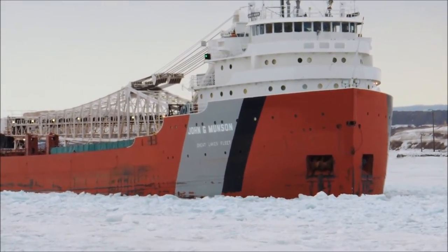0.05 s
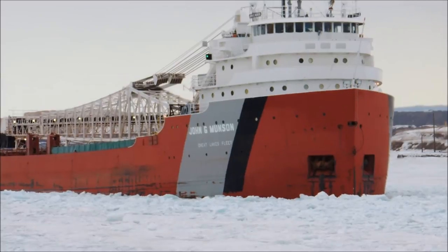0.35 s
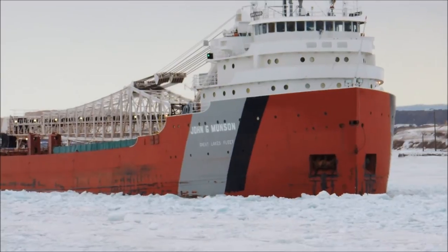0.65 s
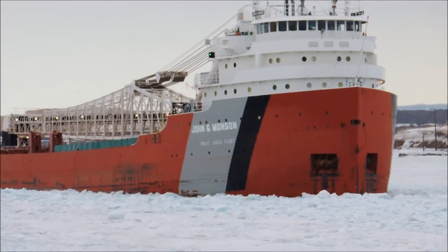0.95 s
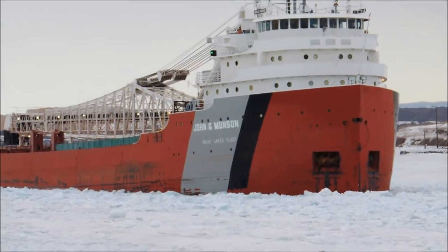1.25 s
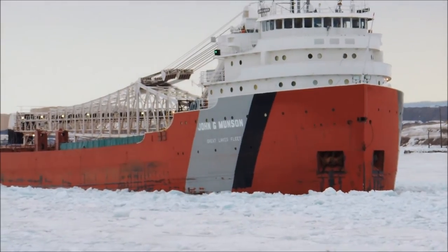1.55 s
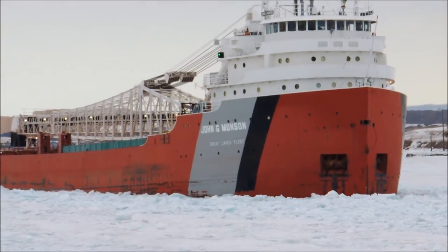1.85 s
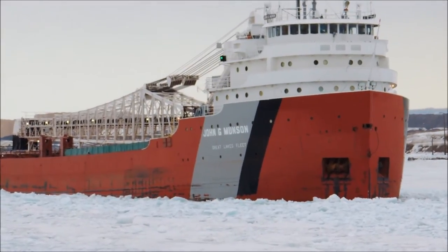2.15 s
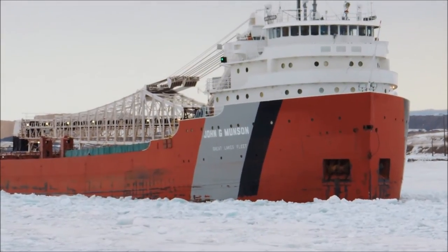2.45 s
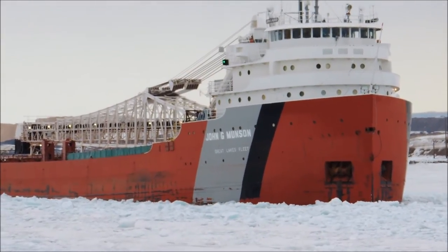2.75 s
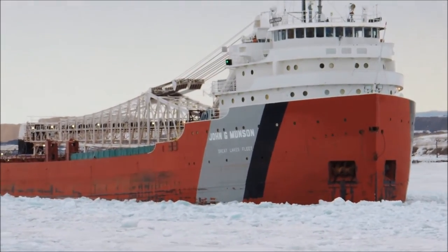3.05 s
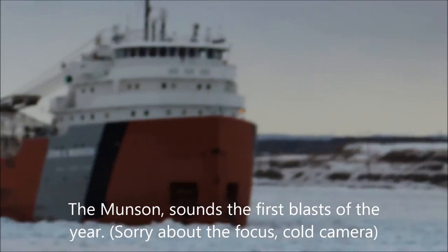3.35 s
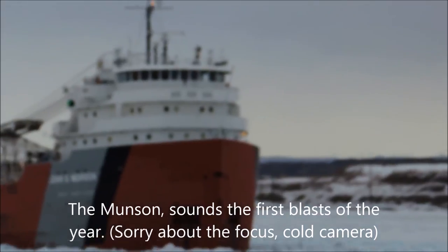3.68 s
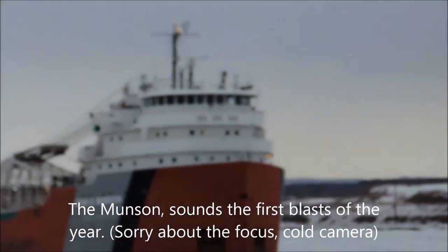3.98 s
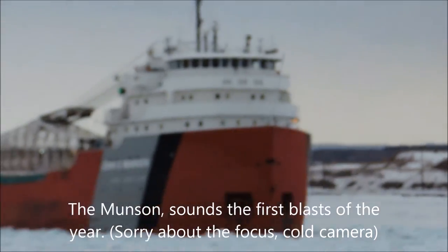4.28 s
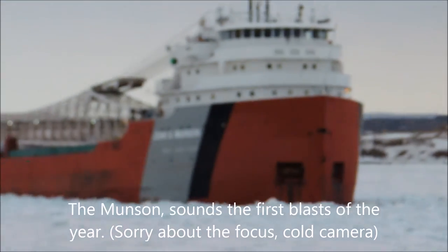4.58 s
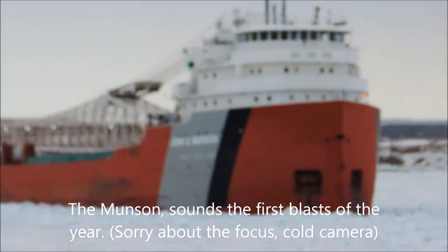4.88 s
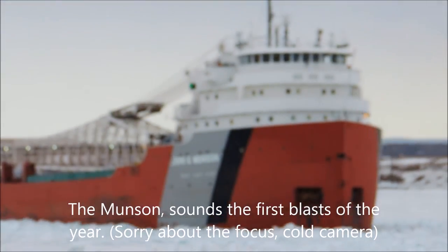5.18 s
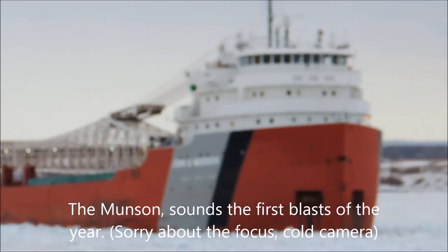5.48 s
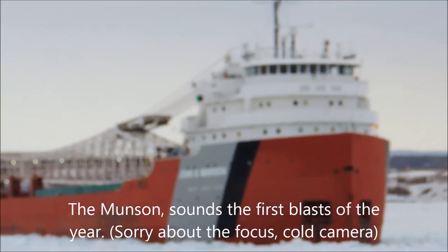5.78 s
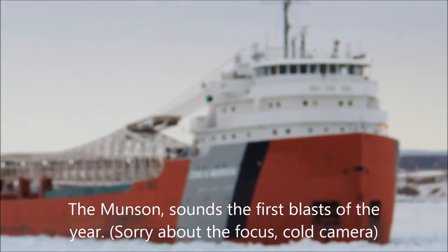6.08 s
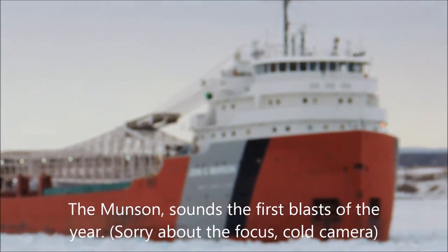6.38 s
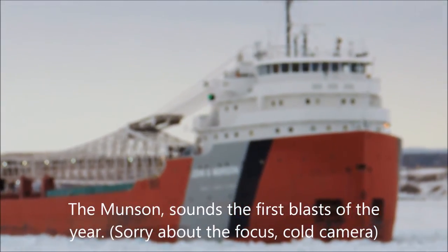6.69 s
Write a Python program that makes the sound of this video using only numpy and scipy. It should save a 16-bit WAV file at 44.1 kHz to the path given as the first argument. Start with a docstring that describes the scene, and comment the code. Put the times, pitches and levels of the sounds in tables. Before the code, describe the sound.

Gusty wind buffets the microphone over a ship's faint drone, then its deep air horn blows twice, echoing from the shore.

```python
"""A freighter's machinery drones in an icy channel while gusts thump and flutter on the right
microphone port; the left one mostly rumbles. Sharp ticks sound; the hand-held camera knocks once.
The ship gives two long blasts on its low air horn: a diaphragm chops air into pulses,
the ice cancels a drifting band and the shore echoes.
The sound drops out briefly and returns with the first blast under way."""
import sys
import numpy as np
from scipy import signal
from scipy.fft import rfft, irfft
from scipy.io import wavfile
from scipy.ndimage import uniform_filter1d

SR = 44100
rng = np.random.default_rng(int(sys.argv[2]) if len(sys.argv) > 2 else 0)


def wrap_up_sound(samples):
    """Save the sound to the file named by the first command line argument, as 16-bit audio."""
    columns = np.atleast_2d(samples).T
    # keep every value between -1 and 1, then stretch to whole-number steps
    tamed = np.clip(columns, -1, 1)
    steps = np.round(tamed * 32767).astype(np.int16)
    wavfile.write(sys.argv[1], SR, steps)


N = 296793
TIME_S = np.arange(N) / SR

# Distant machinery. Each row: frequency in Hz, relative density in dB.
DRONE_SPECTRUM = [(30, 7), (100, 1.5), (170, -5), (400, -10), (500, -3.5), (600, -1), (850, 0), (1140, -4),
                  (1260, -11), (1500, -9.5), (1900, -17.5), (2800, -22), (4000, -30), (8000, -52)]
# Its resonances. Each row: centre in Hz, width in Hz, lift in dB.
DRONE_RESONANCES = [(570, 55, 2.6), (692, 41, 9.9), (986.4, 55, 11.8), (1138, 37, 5.9), (1485, 140, 2.8),
                    (2483, 99, 11.4)]
# The drone as the wind carries it. Each row: time in seconds, level in dB.
DRONE_LEVELS = [(0, -45), (1.8, -44.5), (2.5, -45), (3.3, -44.5), (5.0, -45), (6.73, -43.5)]

# Wind flutter, port rumble, microphone hiss. Each row: frequency in Hz, relative density in dB.
FLUTTER_SPECTRUM = [(15, -19), (40, -3.5), (80, 3), (125, 1.5), (210, -5), (350, -9.5), (500, -16),
                    (800, -27), (1300, -38.5), (2500, -65), (6000, -73)]
RUMBLE_SPECTRUM = [(3, -6.5), (10, -3), (20, -10), (40, -16), (65, -30), (110, -53), (250, -54), (800, -82)]
HISS_SPECTRUM = [(100, -1), (3000, 3), (5000, 2.5), (8000, 1), (14000, -0.5)]
# Gusts at the right port. Each row: start in seconds, hold in seconds, level in dB.
GUSTS = [(0.185, .02, -32.5), (.772, .06, -19.5), (1.307, .06, -23.5), (1.44, 0.16, -29),
         (1.786, 0.13, -31), (2.022, .05, -32), (2.38, 0.12, -38.5), (2.898, 0.15, -35.5), (3.81, .02, -25),
         (4.3, 0.14, -23), (4.57, 0.16, -24.5), (4.747, 0.027, -19), (4.93, .12, -24.5),
         (5.095, 0.054, -20.5), (5.518, 0.079, -16), (5.636, .26, -18), (6.122, 0.6, -21)]
# Hardest eddies at each port. Each row: centre in seconds, envelope peak in dB, frequency in Hz.
RIGHT_EDDIES = [(.19, -14, 234), (.549, -2, 174), (.771, -6, 210), (.81, -11, 220), (1.324, -8, 204),
                (1.45, -11.5, 197), (1.492, -9, 260), (1.554, 0, 240), (1.907, -14, 170), (4.669, -9, 187),
                (4.74, -10.5, 239), (4.786, -2, 174), (5.08, -5, 172), (5.115, 0, 138), (5.331, -6.5, 167),
                (5.526, 0, 374), (5.548, 2, 276), (5.65, -0.5, 245), (5.67, -3.5, 261), (5.707, -1, 212),
                (5.733, -2.5, 213), (5.76, -3.5, 205), (5.793, -3.5, 196), (5.876, -7.5, 254),
                (6.219, -2, 307), (6.323, -1.5, 283), (6.404, -4, 166), (6.494, -1, 330)]
LEFT_EDDIES = [(2.505, -21.5, 330), (2.6, -19.5, 344), (3.292, -24.5, 160)]

# Short ticks and the cracks of hard wind thumps.
# Each row: start in seconds, peak in dB, band in Hz, T60 in seconds, left over right in dB.
SHARP_TICKS = [(.819, -40.5, 4800, .02, -6), (4.044, -28.5, 2250, 0.036, -1),
               (4.0731, -25, 4400, 0.0039, 3), (4.072, -21.5, 1690, 0.011, 1), (5.077, -31, 1500, .026, 0),
               (5.116, -36, 5000, 0.0043, -9), (5.15, -30.5, 1970, 0.017, 5), (5.29, -37, 1800, 0.017, 0),
               (5.548, -18, 1100, 0.012, -13), (5.706, -29, 744, 0.019, -9), (6.398, -30, 2770, 0.012, -3)]
# Camera body modes. Each row: frequency in Hz, relative level in dB, T60 in seconds.
BODY_MODES = [(626, 3.5, 0.041), (776, -17, .03), (897, -5, 0.048), (1033, 0, .035), (1214, -2, 0.032),
              (1810, -19, 0.045), (2235, -19, 0.019), (3200, -37, 0.04)]

# Horn blasts. Each row: valve opening, attack and valve closing in seconds, base level in dB,
# opening surge in dB, surge length in seconds.
BLASTS = [(3.314, 0.0296, 4.44, -23, 2.5, 0.46), (5.955, .163, 6.9, -22, 2, 0.13)]
# Horn spectrum, one list a blast. Each row: harmonic number, relative level in dB.
HORN_PARTIALS = [
    [(1, 2), (2, 4.5), (3, -7.5), (4, -5.5), (5, -4), (6, -9), (7, -8.5), (8, 0), (9, -2.5), (10, -2),
     (11, 1), (12, -4.5), (13, -8), (14, -16.5), (15, -17), (16, -28), (17, -28), (18, -29), (19, -24),
     (20, -32.5), (21, -26), (22, -24.5), (23, -28.5), (24, -45), (25, -35), (26, -36), (27, -32),
     (28, -33.5), (29, -36), (30, -36.5)],
    [(1, 3), (2, -1.5), (3, 2), (4, 1.5), (5, -5.5), (6, -11), (7, -1.5), (8, -7), (9, -6), (10, -9.5),
     (11, -8.5), (12, -12.5), (13, -10), (14, -14.5), (15, -15.5), (16, -20), (17, -25), (18, -22),
     (19, -22), (20, -25), (21, -20.5), (22, -24.5), (23, -25.5), (24, -30), (25, -30), (26, -44),
     (27, -33.5), (28, -35.5), (29, -30), (30, -36)],
]
# Band cancelled by the ice reflection, one list a blast.
# Each row: time in seconds, centre in Hz, depth in dB (negative lifts).
ICE_NOTCHES = [
    [(3.4, 957, 16), (3.6, 979, 17), (3.85, 996, 12), (4.15, 1136, 23), (4.3, 1067, 31), (4.5, 1056, 12)],
    [(6.1, 1860, 18), (6.22, 1790, -5), (6.45, 1700, 12), (6.73, 1695, -2)],
]
# Drift of two horn bands, one list a blast. Each row: time in seconds, level in dB (used less its mean).
UPPER_MID_DRIFT = [
    [(3.41, -40), (3.8, -42.5), (3.95, -41.9), (4.16, -39), (4.35, -35)],
    [(6.16, -37.2), (6.32, -38), (6.5, -33), (6.69, -32.5)],
]
TREBLE_DRIFT = [
    [(3.41, -50.5), (3.7, -43), (3.98, -47), (4.27, -44.5), (4.42, -50)],
    [(6.16, -40.5), (6.34, -50.3), (6.58, -39), (6.69, -45)],
]

HORN_HZ = 86.74  # at full pressure
DROPOUT_START_S, DROPOUT_END_S = 3.306, 3.371


def undb(db):
    """Decibels to gain."""
    return 10 ** (np.asarray(db) / 20)


def curves(table):
    """Value columns of (seconds, value, ..) rows, at every sample."""
    times_s, *columns = np.transpose(table)
    return [np.interp(TIME_S, times_s, column) for column in columns]


def noise(spectrum, resonances=()):
    """Unit-rms noise with the given spectrum, raised at its resonances."""
    bins_hz = np.fft.rfftfreq(N, 1 / SR) + 1e-3
    hz, db = np.transpose(spectrum)
    shape_db = np.interp(np.log(bins_hz), np.log(hz), db)
    for centre_hz, width_hz, lift_db in resonances:
        shape_db += lift_db / (1 + (2 * (bins_hz - centre_hz) / width_hz) ** 2)
    shaped = irfft(rfft(rng.standard_normal(N)) * undb(shape_db), N)
    return shaped / shaped.std()


def wander(rate_hz):
    """Smooth random curve, spread near 1."""
    steps = rng.standard_normal(2048)
    ramps = np.interp(TIME_S * rate_hz, np.arange(len(steps)), steps)
    return 1.3 * uniform_filter1d(ramps, int(SR / rate_hz / 2) + 1)


def add(track, start_s, sound):
    """Mix a short sound into a track."""
    i = int(start_s * SR)
    track[i:i + len(sound)] += sound[:N - i]


def machinery(shared_power=0.32, swell_db=1.3):
    """Engine and fans drone through fixed resonances and swell slightly."""
    level_db, = curves(DRONE_LEVELS)
    common, *sides = (noise(DRONE_SPECTRUM, DRONE_RESONANCES) for _ in range(3))
    drone = np.sqrt(shared_power) * common + np.sqrt(1 - shared_power) * np.array(sides)
    return undb(level_db + swell_db * wander(5)) * drone


def airflow_db(attack_s=0.013, release_s=0.048, unsteady_db=1.43):
    """Wind strength: each gust rises fast, holds and dies back into an unsteady breeze."""
    breeze_db = np.where(TIME_S < DROPOUT_START_S, -39.5, -31)
    power = undb(breeze_db) ** 2
    for start_s, hold_s, db in GUSTS:
        before = np.maximum(start_s - TIME_S, 0) / attack_s
        after = np.maximum(TIME_S - start_s - hold_s, 0) / release_s
        power += (undb(db) * np.exp(-np.minimum(before + after, 20))) ** 2
    return 10 * np.log10(power) + unsteady_db * wander(18)


def small_eddies(flow_db, rate_hz=20, over_flow_db=7.5, scatter_db=1.5, centre_hz=175, spread_oct=0.27):
    """Rows of eddies that arrive at random, scaled by the flow that carries them."""
    gaps, sizes, pitches = rng.standard_normal((400, 3)).T
    times_s = .05 + np.cumsum(abs(gaps)) * np.sqrt(np.pi / 2) / rate_hz
    lifts_db = over_flow_db + scatter_db * np.tanh(sizes)
    pitches_hz = centre_hz * 2 ** (spread_oct * pitches)
    return [(at_s, flow_db[int(at_s * SR)] + lift_db, hz)
            for at_s, lift_db, hz in zip(times_s, lifts_db, pitches_hz) if at_s < TIME_S[-1]]


def eddy_thumps(eddies, width_cycles=0.56, rasp_db=-19.5, rasp_t60_s=0.057, rasp_hz=(310, 756.4)):
    """Each eddy sucks at the port, then pushes, and breaks up in a short rasp."""
    out, t = np.zeros(N), np.arange(-SR // 50, SR // 50) / SR
    band = signal.butter(3, rasp_hz, "band", fs=SR, output="sos")
    for (at_s, db, hz), white in zip(eddies, rng.standard_normal((512, len(t)))):
        swing = np.sin(2 * np.pi * hz * t) / (1 + (hz * t / width_cycles) ** 2) ** 2.3
        add(out, at_s + t[0], undb(db) * swing)
        rasp = signal.sosfilt(band, white * undb(-60 * (t - t[0]) / rasp_t60_s))
        add(out, at_s - .5 / hz, undb(1.22 * db + rasp_db) * rasp / abs(rasp).max())  # hard hits rasp most
    return out


def wind(ragged_db=2.5, leak_db=-31, left_flutter_db=-27, left_rumble_db=-24, right_rumble_db=-42):
    """Ragged flutter and thumps at the right port; mostly slow, heaving pressure at the left."""
    flow_db = airflow_db()
    ragged = undb(ragged_db * wander(70))
    flutter = noise(FLUTTER_SPECTRUM) * ragged / np.sqrt(np.mean(ragged ** 2))
    heave = undb(.02 * (flow_db - flow_db.mean()))
    left = undb(left_rumble_db) * heave * noise(RUMBLE_SPECTRUM)
    left += undb(flow_db + left_flutter_db) * noise(FLUTTER_SPECTRUM)
    left += eddy_thumps(LEFT_EDDIES)
    right_rumble = undb(right_rumble_db) * heave * noise(RUMBLE_SPECTRUM)
    right = undb(flow_db) * flutter + eddy_thumps(RIGHT_EDDIES + small_eddies(flow_db))
    return np.array([left + undb(leak_db) * right, right + right_rumble])


def ticks_and_knock(knock_s=4.041, knock_db=-10, contact_s=0.0072):
    """Sharp ticks and cracks; a soft knock rings the camera body, swelling during contact."""
    out, t = np.zeros((2, N)), np.arange(SR // 8) / SR
    ring = sum(undb(db - 60 * abs(t - contact_s) / t60_s) * np.sin(2 * np.pi * (hz * t + rng.random()))
               for hz, db, t60_s in BODY_MODES)
    knock = ring * np.minimum(t / contact_s, 1) ** 2
    for side, sign in zip(out, (1, -1)):
        add(side, knock_s, undb(knock_db) * knock / abs(knock).max())
        for start_s, db, hz, t60_s, pan_db in SHARP_TICKS:
            band = signal.butter(1, [hz / 2, hz * 1.24], "band", fs=SR, output="sos")
            burst = rng.standard_normal(len(t)) * undb(-60 * t / t60_s)
            tick = signal.sosfilt(np.vstack([band, band]), burst)
            add(side, start_s, undb(db + sign * pan_db / 2) * tick / abs(tick).max())
    return out


def valve(open_s, attack_s, close_s, base_db, surge_db, surge_s):
    """Pitch, level and brightness follow the air pressure: it builds, surges, holds and drains."""
    since_full_s = TIME_S - open_s - attack_s
    build_loss_db = 42.5 * np.clip(-since_full_s / attack_s, 0, 1)
    drain_loss_db = 147 * np.clip(TIME_S - close_s, 0, 1)
    lift_db = surge_db * np.exp(-(since_full_s / surge_s) ** 4)
    level_db = base_db + lift_db - build_loss_db - drain_loss_db
    tilt_db_per_oct = -0.23 * build_loss_db - 0.13 * drain_loss_db
    scoop_hz = 0.98 * np.exp(np.minimum(-since_full_s / (0.28 * attack_s), 1))
    sag_hz = 17 * np.clip(TIME_S - close_s + .135, 0, .5)  # sinks as the valve starts to shut
    return HORN_HZ - scoop_hz - sag_hz, level_db, tilt_db_per_oct


def band_drift_db(curve, hz, centre_hz, width_oct, offset_db):
    """Lift or cut that a band's level curve gives a partial at hz."""
    times_s, db = np.transpose(curve)
    weight = np.exp(-(np.log2(hz / centre_hz) / width_oct) ** 2)
    return weight * np.interp(TIME_S, times_s, db - db.mean() + offset_db)


def air_rasp(phase, level_db, rasp_db=-29):
    """Escaping air hisses once a cycle, while the diaphragm is open."""
    opening = ((1 + np.cos(phase)) / 2) ** 2
    hiss = noise([(200, -10), (800, -8), (1500, 0), (2800, -10), (4000, -27), (8000, -54.5)])
    return undb(level_db + rasp_db) * opening * hiss


def horn_blast(blast, partials, ice_notch, upper_mid, treble,
               notch_width_hz=130, solo_fade_db=3, group_fade_db=1.5, smear_rad=1.07, smear_s=0.001342):
    """The diaphragm chops air into pulses; moving air on the way fades partials, alone and in groups."""
    open_s, _, close_s, *_ = blast
    on = (TIME_S > open_s) & (TIME_S < close_s + .5)
    pitch_hz, level_db, tilt_db_per_oct = valve(*blast)
    notch_hz, depth_db = curves(ice_notch)
    phase = 2 * np.pi * np.cumsum(pitch_hz * (1 + 0.0012 * wander(45))) / SR
    partials_db = np.array(partials)[:, 1]
    top_db = partials_db[-4:].mean() - 4 - 0.9 * np.arange(1, 17)  # distance swallows the highest
    groups = [wander(5)[on] for _ in range(16)]
    out = np.zeros(N)
    for k, partial_db in enumerate(np.r_[partials_db, top_db], 1):
        hz = k * pitch_hz[on]
        source_db = partial_db + level_db[on] + tilt_db_per_oct[on] * np.log2(k / 8)
        exposure = min(k / 22, 1)  # short waves are disturbed most
        fade_db = exposure * (solo_fade_db * wander(8)[on] + group_fade_db * exposure * groups[k // 3])
        notch_db = depth_db[on] / (1 + (2 * (hz - notch_hz[on]) / notch_width_hz) ** 2)
        drift_db = band_drift_db(upper_mid, k * HORN_HZ, centre_hz=1630, width_oct=0.45, offset_db=0.5)
        drift_db += band_drift_db(treble, k * HORN_HZ, centre_hz=2700, width_oct=0.32, offset_db=2)
        # unequal paths smear each pulse
        lag_rad = smear_rad * np.sin(2 * np.pi * hz * smear_s) + 0.6 * exposure * wander(9)[on]
        out[on] += undb(source_db + drift_db[on] - notch_db + fade_db) * np.cos(k * phase[on] + lag_rad)
    return out + on * air_rasp(phase, level_db + tilt_db_per_oct)


def shore_echo(direct, delay_s=.06, t60_s=5.3, length_s=2, cutoff_hz=1300):
    """Late, dull echoes from the shore and the ice field."""
    t = np.arange(length_s * SR) / SR
    tail = rng.standard_normal(len(t)) * undb(-60 * t / t60_s) * (t > delay_s)
    lowpass = signal.butter(1, cutoff_hz, fs=SR, output="sos")
    tail = signal.sosfilt(lowpass, tail / np.linalg.norm(tail))
    return signal.fftconvolve(direct, tail)[:N]


def air_horn(left_db=-22, left_echo_db=-26, right_echo_db=-14.5):
    """Both blasts and their echoes, far stronger on the right."""
    blasts = zip(BLASTS, HORN_PARTIALS, ICE_NOTCHES, UPPER_MID_DRIFT, TREBLE_DRIFT)
    direct = sum(horn_blast(*parts) for parts in blasts)
    right = direct + undb(right_echo_db) * shore_echo(direct)
    left = undb(left_db) * direct + undb(left_echo_db) * shore_echo(direct)
    return np.array([left, right])


def scene():
    """Horn over machinery, wind, ticks and a knock."""
    return air_horn() + machinery() + wind() + ticks_and_knock()


def record(dry, hiss_db=-56.5, cutoff_hz=14350):
    """The microphones hiss and round the hardest thumps; the sound drops out once; the top is cut."""
    noisy = dry + undb(hiss_db) * np.array([noise(HISS_SPECTRUM), noise(HISS_SPECTRUM)])
    rounded = noisy / (1 + noisy ** 4) ** (1 / 4)
    edges_s = [DROPOUT_START_S - .008, DROPOUT_START_S, DROPOUT_END_S, DROPOUT_END_S + .0005]
    gate = np.interp(TIME_S, edges_s, [1, 0, 0, 1])
    lowpass = signal.ellip(12, .1, 80, cutoff_hz, fs=SR, output="sos")
    return signal.sosfilt(lowpass, gate * rounded)


dry = scene()
out = record(dry)
wrap_up_sound(out)
```